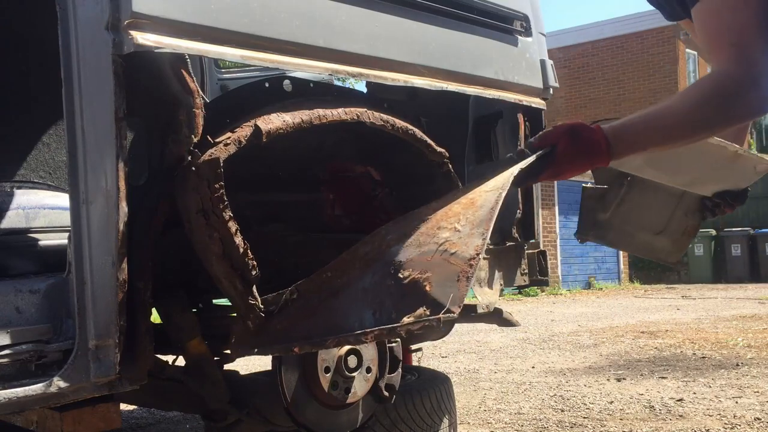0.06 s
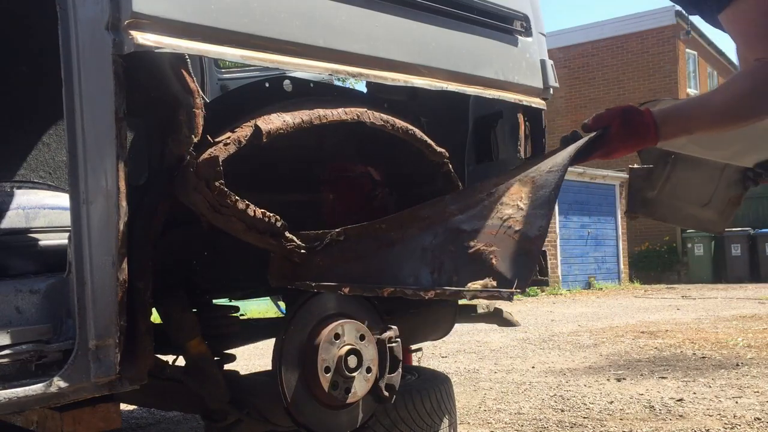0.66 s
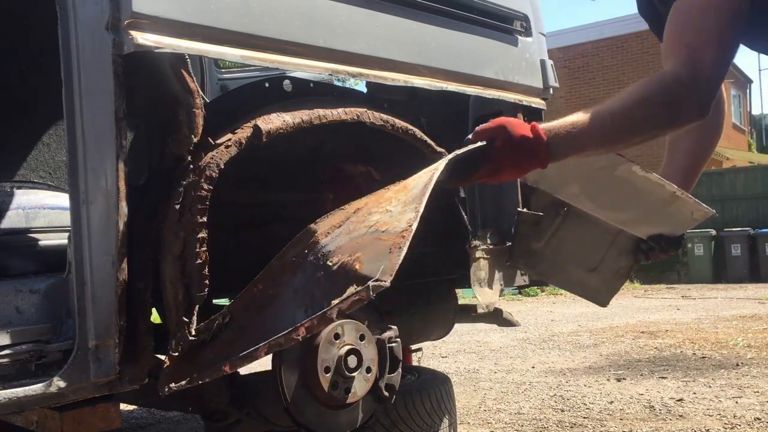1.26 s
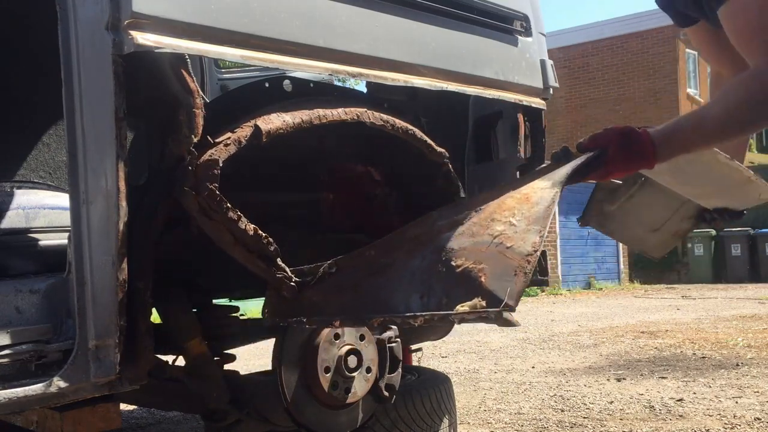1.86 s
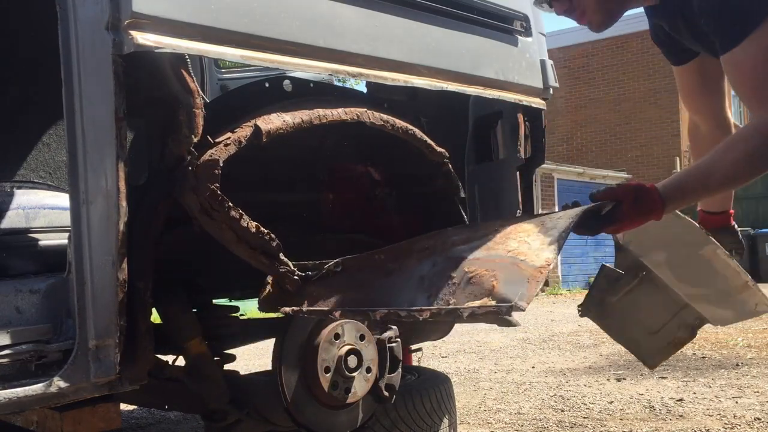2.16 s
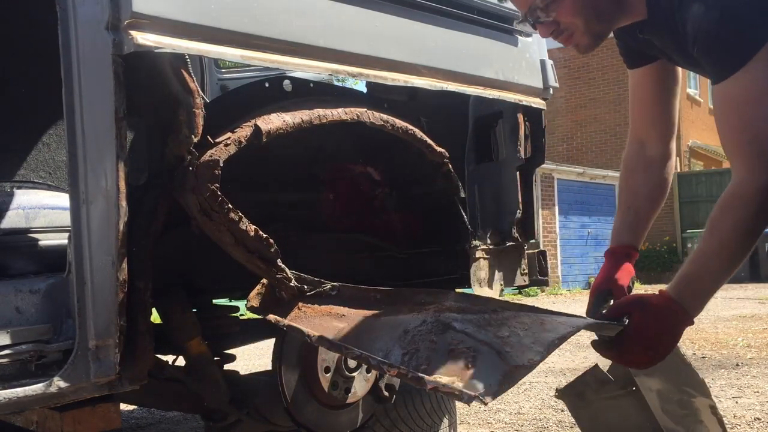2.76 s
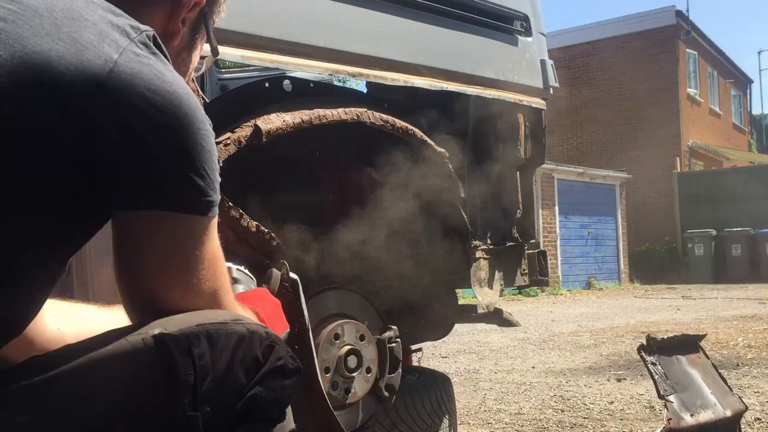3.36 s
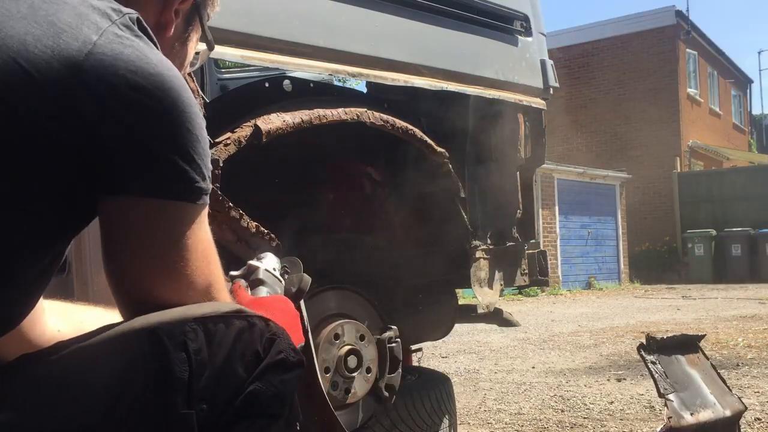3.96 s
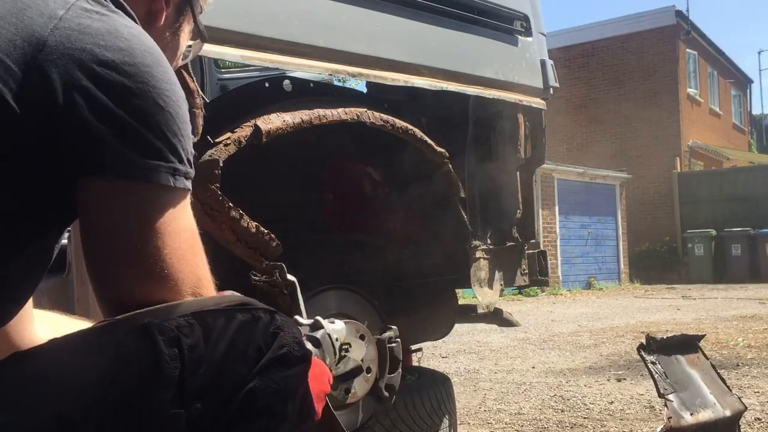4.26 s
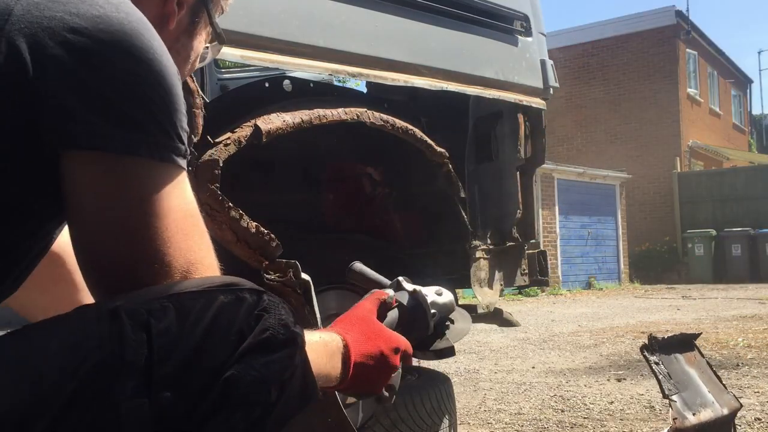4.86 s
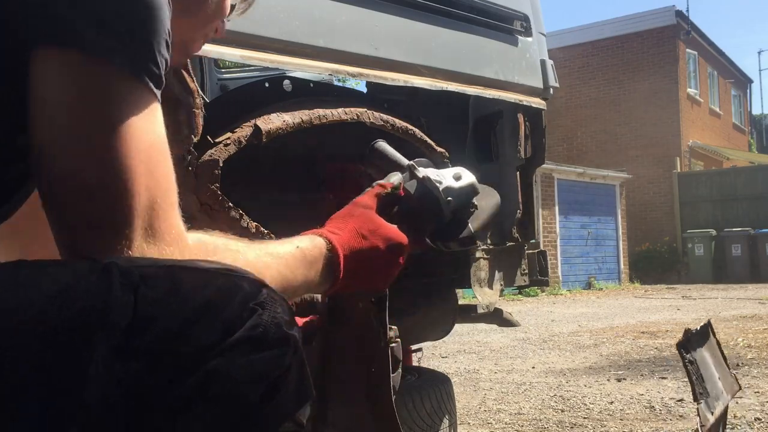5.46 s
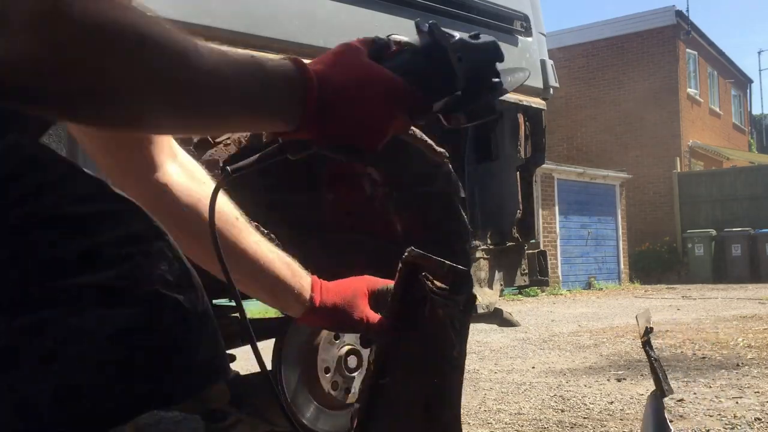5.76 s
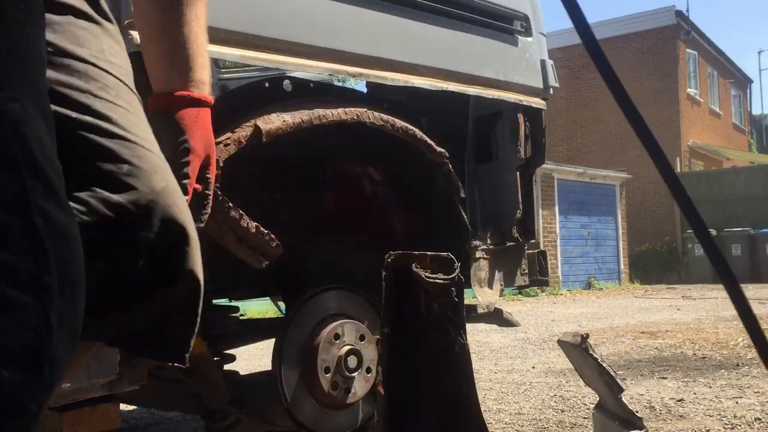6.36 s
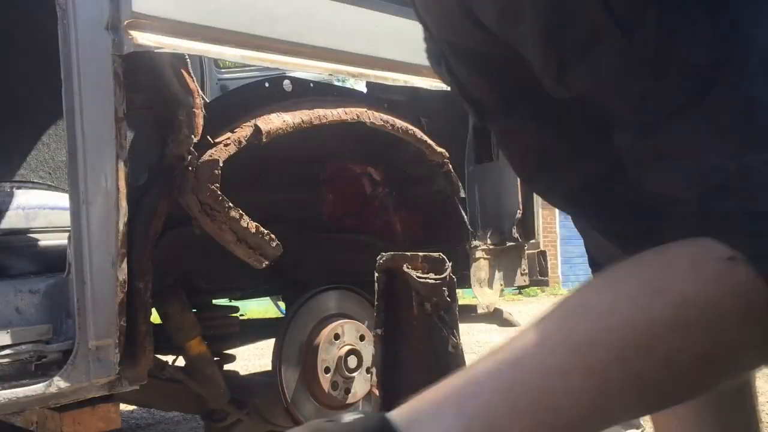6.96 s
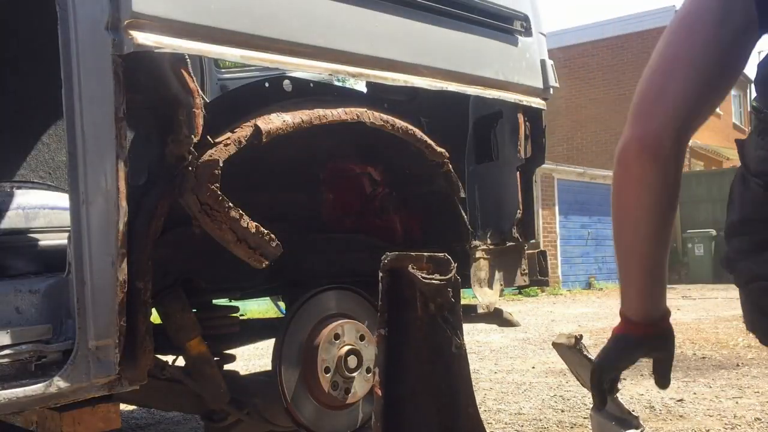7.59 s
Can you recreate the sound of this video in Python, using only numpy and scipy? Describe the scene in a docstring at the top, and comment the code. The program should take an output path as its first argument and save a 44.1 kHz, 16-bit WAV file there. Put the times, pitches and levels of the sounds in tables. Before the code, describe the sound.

Close up outdoors, a rusty steel panel is bent back and forth, crackling, creaking and snapping, with a few booming clangs as it buckles. Abruptly an angle grinder is cutting the metal, harsh and hissing, for under a second. Switched off, it coasts down with a falling whine and rattling gears. The loose panel gets knocked about, shoes scuff on gravel, and the grinder is set down with a clack.

```python
"""Rust crackles on a steel panel bent to and fro outdoors: seams snap, the sheet buckles and booms.
Abruptly an angle grinder is cutting it, grit tearing at the steel under a hiss of sparks.
Switched off, the grinder coasts down with a falling whine and the rattle of slack gears.
The freed panel is knocked about, shoes scuff the gravel and the grinder is put down."""
import sys
import numpy as np
from scipy import signal
from scipy.fft import rfft, irfft, next_fast_len
from scipy.io import wavfile
from scipy.ndimage import uniform_filter1d, map_coordinates

SR = 44100
rng = np.random.default_rng(int(sys.argv[2]) if len(sys.argv) > 2 else 0)


def unload_wav(signal):
    """Save mono or channel-first audio to the path in sys.argv[1] as 16-bit WAV at rate SR, clipped to [-1, 1]."""
    wavfile.write(
        sys.argv[1],
        SR,
        np.round(np.clip(np.atleast_2d(signal).T, -1, 1) * 32767).astype(np.int16),
    )


N = 336474
TIME = np.arange(N) / SR
CUT_START_S, CUT_END_S, SWITCH_OFF_S, PUT_DOWN_S = 3.264, 3.985, 4.08, 7.25
LOADED_SPEED, FREE_SPEED = 201, 228.8   # spindle turns per second, like every speed below


# Hits on the panel. Each row: start in seconds, boom, clang, crack and sizzle in dB, accent ring in Hz.
PANEL_HITS = [(0.58, -33.5, -26, -31.5, -34, 740), (1.119, -71, -55, -37.5, -28.5, 3500),
              (1.2509, -81, -48.5, -31.5, -32, 2900), (1.541, -88, -79, -43, -29.5, 1890),
              (1.821, -55.5, -50, -49, -63, 1710), (2.391, -58, -45, -43, -54, 1240),
              (2.507, -40.5, -29, -37.5, -40, 1070), (2.795, -35.5, -28, -45, -42.5, 1260),
              (2.899, -63, -37, -41.5, -54, 1530), (3.096, -41.5, -32.5, -40, -50, 572),
              (5.791, -53, -31, -24.5, -72, 2000), (6.005, -48, -35.5, -50, -39, 1440),
              (6.217, -29.5, -25.5, -58, -34, 753), (6.434, -68, -37.5, -45, -59, 960),
              (7.241, -50, -32.5, -25.5, -36, 3630)]
# Boom, clang, crack and sizzle. Each row: low and high edge in Hz, attack t60 in seconds,
# tail level in dB, tail t60 in seconds, grit in the tail in dB.
HIT_REGISTERS = [(75.5, 520, 0.2, 8, 0.37, -6.5), (504, 2200, 0.093, -18, 0.22, 0),
                 (1800, 4870, 0.032, -9.5, 0.14, -18), (4000, 9600, 0.0086, -20, 0.11, -13.5)]
# The sheet's resonances. Each row: pitch in Hz, width in Hz, lift in dB.
SHEET_MODES = [(138, 20, 2.5), (170.8, 5.8, 14), (236, 45, -5), (285.7, 4.9, 3.5), (316, 11, 4),
               (635, 58, 0.5), (775, 8.8, 0.5), (904, 27, -2.5), (1480, 8.5, 1)]

def panel_hits(ring_db=10, ring_q=22):
    """A hit is a sharp crack and a dense tail in the sheet; the low registers last longest."""
    out, age = np.zeros(N), TIME[:SR // 2]
    loose_edges = amp(1.3 * waver(200))
    for s, *levels_db, ring_hz in PANEL_HITS:
        start = int(s * SR)
        # the sheet is bent differently each time, so its upper modes move
        modes = [(hz, hz / 60, 0) for hz in np.geomspace(400, 5000, 14) * rng.uniform(.9, 1.1, 14)]
        modes.append((ring_hz, ring_hz / ring_q, ring_db / (1 + (ring_hz / 1700) ** 2)))   # rust damps highs
        for db, (low, high, attack_t60, tail_db, tail_t60, grit_db) in zip(levels_db, HIT_REGISTERS):
            grit = 1 + amp(grit_db) * rng.standard_normal(len(age))
            rattle = np.roll(loose_edges, -start)[:len(age)] * grit
            envelope = amp(-60 * age / attack_t60) + amp(tail_db - 60 * age / tail_t60) * rattle
            burst = bandpass(envelope * rng.choice([-1, 1], len(age)), low, high)
            ring = resonate(burst, SHEET_MODES + modes)
            attack_rms = np.std(ring[:int(0.0099 * SR)])
            out[start:start + len(age)] += amp(db) * ring[:N - start] / attack_rms
    return out


# Weight under two of the hits. Each row: start in seconds, level in dB.
SHEET_THUMPS = [(0.58, -40), (2.506, -35)]

def thumps(t60=0.68):
    """A deep thump heaves through the whole sheet."""
    s, db = np.transpose(SHEET_THUMPS)
    rumble = colour(noise(), [(40, -14), (78, 9.5), (105, 0), (200, 3.5), (290, -7)])
    return fade(clicks(s, amp(db)), t60) * rumble


# Bends and shakes. Each row: peak, rise and fall in seconds, rust level in dB, wobble level in dB.
SHEET_BENDS = [(0.01, 0.077, 0.085, -51.5, -49.5), (0.55, 0.1, 0.12, -42.5, -43.5),
               (0.91, 0.23, 0.11, -55, -55.5), (1.25, 0.66, 0.5, -65, -78), (1.57, 0.18, 0.37, -45, -65),
               (1.665, 0.063, 0.12, -60, -40), (2.63, 0.17, 0.16, -52.5, -49),
               (2.92, 0.36, 0.18, -53.5, -44), (3.15, 0.058, 0.12, -54.5, -44),
               (4.96, 0.29, 0.66, -71, -43.5), (5.87, 0.25, 0.32, -65, -33.5),
               (6.2, 0.99, 0.093, -56, -40.5), (6.54, 0.14, 0.096, -70.5, -41.5)]

def bending():
    """Strain sheds rust, slips the seam, creaks the fold and sets the sheet wobbling."""
    flaking, flexing = swells(SHEET_BENDS)
    return flaking * rust_crackle() + seam_slips() + flakes() + creaks() + flexing * wobble()


# Tone of crumbling rust. Each row: frequency in Hz, relative level in dB.
RUST_EQ = [(300, -35.5), (1250, -23), (1900, 5.5), (2500, -9), (3300, 0.5), (5500, -8), (16000, -14.5)]

def rust_crackle():
    """Rust breaks off in coarse, medium and fine grains."""
    crumbs = grains(per_s=200, spread_db=3.5, t60=.02) + amp(-11) * noise()
    for low, high in [(300, 2400), (2400, 5200), (5200, 16000)]:
        crumbs += bandpass(grains(per_s=180, spread_db=4.5, t60=0.028), low, high)
    return colour(crumbs, RUST_EQ)


# The rusty seam giving way. Each row: start in seconds, relative level in dB.
SEAM_SLIPS = [(0.182, -45), (0.456, -38), (0.473, -35.5), (0.501, -38.5), (0.531, -39), (0.557, -40),
              (0.792, -43), (0.909, -49), (1.394, -41.5), (1.47, -55), (1.516, -44), (1.596, -41),
              (1.62, -36.5), (1.719, -38.5), (2.587, -39), (2.602, -33), (2.767, -38), (3.203, -46.5)]

def seam_slips(t60=0.037, ring_db=8):
    """Each slip is a gritty tick with a pitch of its own, and stirs the hollow of the sheet."""
    out, age = np.zeros(N), TIME[:SR // 2]
    for s, db in SEAM_SLIPS:
        burst = rng.standard_normal(len(age)) * amp(-60 * age / t60)
        hz = rng.uniform(1400, 4000)
        tick = resonate(bandpass(burst, 1900, 8000, order=1), [(hz, hz / 6, ring_db)])
        hollow = resonate(burst, [(780, 130, -5)]) - burst
        start = int(s * SR)
        out[start:start + len(age)] += amp(db) * (tick + hollow)
    return out


# Single flakes. Each row: start in seconds, relative level in dB.
RUST_FLAKES = [(0.361, -40), (0.571, -29), (1.495, -43), (1.54, -25.5), (2.365, -39.5), (2.603, -50),
               (2.879, -41), (2.898, -29.5), (3.193, -45)]

def flakes():
    """A flake of rust cracks off with a thin, bright tick and a faint tail."""
    s, db = np.transpose(RUST_FLAKES)
    taps = clicks(s, amp(db))
    burst = (fade(taps, t60=0.012) + amp(-24) * fade(taps, t60=0.1)) * noise()
    return signal.sosfilt(signal.butter(2, 6500, "high", fs=SR, output="sos"), burst)


# Creaks in the fold. Each row: peak and half length in seconds, pitch in Hz, level in dB.
FOLD_CREAKS = [(0.808, 0.03, 2140, -45), (0.996, 1.03, 4200, -64.5), (1.648, 0.042, 780, -51),
               (2.129, 0.055, 1070, -49), (2.153, 0.033, 1880, -49), (1.822, 0.032, 1900, -45.5),
               (2.908, 0.057, 1940, -44.5)]

def creaks(slips_per_s=190, q=11):
    """Steel drags on steel: a fast, uneven run of slips rings one resonance and its overtone."""
    times = swings(slips_per_s, slip=0.83)
    drag = fade(clicks(times, rng.random(len(times))), t60=0.019) * noise()
    out = 0
    for s, half_s, hz, db in FOLD_CREAKS:
        ring = resonate(drag, [(hz, hz / q, 27), (1.5 * hz, hz / q, 2)]) - drag
        out += amp(db) * swell(s, half_s, half_s) * unit(ring)
    return out


# Tone of the flexing sheet. Each row: frequency in Hz, relative level in dB.
WOBBLE_EQ = [(70, -17.5), (160, -1.5), (300, -5), (450, -8), (780, -5.5), (1200, -7.5), (3000, -36)]

def wobble():
    """The flexing sheet drums, low and lumpy, in its own resonances."""
    return unit(resonate(colour(grains(per_s=140, spread_db=5.0, t60=0.17), WOBBLE_EQ), SHEET_MODES))


# The grinder comes out from behind the worker, swings past and is carried off.
# Each row: time in seconds, gain on its running noises in dB.
GRINDER_NEARNESS = [(3.26, -11), (3.95, -4), (4.25, 0), (5.0, 1.5), (5.45, 0), (5.77, 0.5), (6.55, -2),
                    (6.85, -9), (7.25, -7)]

def grinder(tight_speed=205, slack_span=70, feeble_speed=36.2, whine_speed=158, whine_span=70):
    """The cut plus fan, bearings and gears, whose levels follow the spindle speed until put down."""
    speed = spindle_speed()
    turns = np.cumsum(speed) / SR
    halvings = np.log2(FREE_SPEED / speed)
    slack = np.clip((tight_speed - speed) / slack_span, 0, .9)
    near_db, = curves(GRINDER_NEARNESS)
    feeble_db = 11 * np.maximum(np.log2(feeble_speed / speed), 0)   # extra loss near standstill
    fan_db = near_db - 26 - 9 * halvings
    bearing_db = near_db - 28.5 - 8 * halvings - 2 * feeble_db
    whine_db = near_db - 35.5 - 10 * ((speed - whine_speed) / whine_span) ** 2
    rattle, shaking = gear_rattle(speed, turns, near_db - 29.5 - feeble_db)
    # as the spindle slows, the play in the gears chops the running noise into bursts
    chop = np.sqrt(1 - slack + slack * np.abs(shaking))
    fan = np.sqrt(chop) * amp(fan_db) * fan_air()
    rush = chop * amp(bearing_db) * bearing_rush(turns)
    whine = chop * amp(whine_db) * gear_whine(turns, slack)
    hum = amp(fan_db - 25.5) * (1 - slack) * np.sin(4 * np.pi * turns + waver(50))
    roar = steel_echoes(fan + rush + cutting(turns))
    audible = (TIME > CUT_START_S) & (TIME < PUT_DOWN_S)
    return audible * (roar + whine + hum + rattle + chop * singing())


def spindle_speed(breakthrough_s=(3.55, 3.95), friction=42.28, drag_speed=147.58):
    """Up as the disc breaks through, then down under friction (turns per s per s) and fan drag."""
    driven = np.interp(TIME, breakthrough_s, [LOADED_SPEED, FREE_SPEED])
    off_s = np.maximum(TIME - SWITCH_OFF_S, 0)
    # drag equals friction at drag_speed
    coasting = drag_speed * np.tan(np.arctan(FREE_SPEED / drag_speed) - friction / drag_speed * off_s)
    return np.clip(coasting, 1, driven)


# Fader moves for the cut. Each row: time in seconds, relative grind and spark levels in dB.
CUT_LEVELS = [(3.28, -28, -42), (3.594, -30.5, -41), (3.696, -31.5, -56), (3.798, -29, -43),
              (3.898, -31, -56), (3.91, -32.5, -41), (4.048, -27, -50), (4.08, -22, -37)]
# Steel ringing at the slot. Each row: pitch in Hz, width in Hz, lift per pass in dB.
SLOT_MODES = [(1290, 90, 3.5), (1444, 60, 0), (2580, 180, -13.5), (4030, 80, -12)]
# Tones of the grind, sparks and ringing sheet. Each row: frequency in Hz, relative level in dB.
GRIND_EQ = [(1500, -4), (2200, -9), (2550, 5.5), (3150, 7.5), (4050, 7.5), (4700, 7), (4950, 4), (6200, -1),
            (8000, -9)]
SPARK_EQ = [(4500, -47), (6500, -1.5), (8300, 3), (10500, -4.5), (16000, -5)]
RING_EQ = [(90, 2.5), (160, -5), (400, -3.5), (700, 0), (1900, 1.5), (2600, -3)]

def cutting(turns, first_bite_s=0.17, lift_s=0.17):
    """Grit tears the steel, harder once a turn and whenever the disc bounces in the slot."""
    grind_db, spark_db = curves(CUT_LEVELS)
    # the sheet rings hardest as the disc first bites, then settles
    ring_db = -42 + 13 * np.exp(-((TIME - CUT_START_S) / first_bite_s) ** 2)
    bounce = np.sqrt(bursts(swings(80, slip=0.33), uneven_db=6.0, t60=0.047) + 0.53)
    bite = bounce * amp(0.53 * np.sin(2 * np.pi * turns))
    grind = colour(bite * grains(per_s=6400, spread_db=3.0, t60=0.0014), GRIND_EQ)
    for _ in range(2):
        grind = unit(resonate(grind, SLOT_MODES))
    sparks = colour(np.sqrt(bite) * grains(per_s=8900, spread_db=-6.0, t60=0.001), SPARK_EQ)
    ringing = unit(resonate(colour(np.sqrt(bite) * noise(), RING_EQ), SHEET_MODES))
    contact = np.clip(1 - (TIME - CUT_END_S) / lift_s, 0, 1)
    return contact * (amp(grind_db + 2.5) * grind + amp(spark_db + 11) * sparks + amp(ring_db) * ringing)


# The hardest knocks of the slack gears. Each entry: start in seconds.
GEAR_KNOCKS = [4.886, 4.96, 4.996, 5.017, 5.039, 5.057, 5.074, 5.099, 5.119, 5.351, 5.376, 5.441, 5.462,
               5.482, 5.505, 5.973, 5.994, 6.022, 6.053, 6.12, 6.146, 6.3, 6.361, 6.383, 6.435, 6.457,
               6.484, 6.513, 6.571, 7.105, 7.141]
# Tone of clashing teeth. Each row: frequency in Hz, relative level in dB.
GEAR_EQ = [(250, -21), (750, 1), (1200, -9), (2200, -2.5), (2700, 2), (4000, 4), (4900, 3), (7000, 1.5),
           (9000, 0), (10200, -8.5), (13300, -10.5), (16000, -10)]

def gear_rattle(speed, turns, rattle_db, clash_t60=0.054, knock_t60=0.029, swell_s=0.00055):
    """The slack gears swing and clash; returns the ringing housing and the relative shaking power."""
    hard = np.array(GEAR_KNOCKS)
    light = swings(np.minimum(31 + 0.38 * speed, 58), slip=.08)
    light = light[np.abs(light[:, None] - hard).min(axis=1) > .016]   # teeth fly free around a knock
    # these envelopes are powers, so decibels double and decay times halve
    strength = amp(2 * (rattle_db + rng.uniform(-1.5, 1.5, N)))
    bed = 0.11 * amp(2 * rattle_db)
    chatter = fade(clicks(light) * strength * amp(2 * 3.0), clash_t60 / 2) + bed
    knocks = fade(clicks(hard) * strength * amp(2 * 6.5), knock_t60 / 2)
    # a clash is a quick run of tooth contacts: it swells for a moment and pulses twice a turn
    pole = np.exp(-1 / (swell_s * SR))
    power = signal.lfilter([1 - pole], [1, -pole], chatter * amp(2 * np.sin(4 * np.pi * turns)) + knocks)
    clashes = np.sqrt(power) * noise()
    ringing = housing(colour(brighten(clashes, speed), GEAR_EQ))
    return np.std(clashes) * unit(ringing), power / uniform_filter1d(power, size=9000)


def brighten(x, speed, above_hz=5400, db_per_halving=3.5, neutral_speed=80):
    """The slower the gears turn, the more treble each clash has."""
    treble = signal.sosfiltfilt(signal.butter(2, above_hz, "high", fs=SR, output="sos"), x)
    halvings = np.clip(np.log2(neutral_speed / speed), -1, 1)
    return x + treble * (amp(db_per_halving * halvings) - 1)


# Resonances of the gear housing and guard. Each row: pitch in Hz, width in Hz, nominal lift in dB.
HOUSING_MODES = [(3680, 660, 1.5), (4110, 310, 5.5), (5370, 43, 14.5), (6830, 87, 7.5), (8350, 290, 9.5),
                 (9070, 78, 11.5), (11840, 160, 8), (14450, 260, 9)]

def housing(x, vary_db=4.5):
    """Every clash lands differently, so each resonance of the housing rings now more, now less."""
    for mode in HOUSING_MODES:
        drive = x * amp(vary_db * np.tanh(waver(35)))
        x = x + resonate(drive, [mode]) - drive
    return x


# Tone of the fan's draught. Each row: frequency in Hz, relative level in dB.
FAN_EQ = [(150, -20.5), (470, -14), (700, 3.5), (1100, -4.5), (1400, 1.5), (2700, 3.5), (4500, 3.5),
          (4950, -6.5), (5800, 3.5), (7500, -6), (16000, -15.5)]

def fan_air(guard_hz=4140):
    """The draught keeps its colour at any speed, ringing the guard and, faintly, the housing."""
    modes = [(hz, width, db - 19) for hz, width, db in HOUSING_MODES] + [(guard_hz, 56, 0.94)]
    return unit(resonate(colour(noise(), FAN_EQ), modes))


# Tone of the bearings. Each row: multiple of the spindle speed, relative level in dB.
BEARING_ORDERS = [(2, -5.5), (6, -33), (13, 3.5), (20, -16), (23.5, 7), (29, 3), (43, 4.5), (48, 11.5),
                  (57, 2.5), (85, -14), (90, -23)]
# How well the guard radiates them. Each row: frequency in Hz, relative level in dB.
GUARD_EQ = [(400, -2.5), (900, -9), (1600, -0.5), (2400, 0), (3000, 5.5), (3750, 6), (4150, 6), (4550, 8),
            (4950, -9.5), (9000, -31)]

def bearing_rush(turns, steps_per_turn=360):
    """Roughness rolls by with the spindle, so the rush falls in pitch as it slows."""
    roughness = rng.standard_normal(int(turns[-1] * steps_per_turn) + 2)
    race = colour(roughness, BEARING_ORDERS, steps_per_turn)
    return colour(map_coordinates(race, [turns * steps_per_turn], order=3), GUARD_EQ)


# Gear and motor tones. Each row: multiple of the spindle speed, relative level in dB.
WHINE_ORDERS = [(22.55, -3), (37, 1), (74, -20)]

def gear_whine(turns, slack):
    """Tones locked to the spindle, roughened as slack teeth mesh unevenly."""
    jitter = 0.26 * waver(55) + 0.46 * slack ** 2 * waver(300)
    return sum(amp(db + 3.5 * waver(70)) * np.sin(2 * np.pi * multiple * turns + jitter)
               for multiple, db in WHINE_ORDERS)


# Disc and guard sing out. Each row: peak and half length in seconds, pitch and width in Hz, level in dB.
SINGING_SWELLS = [(3.366, 0.09, 4020, 262, -26), (3.607, 0.026, 2540, 251, -30.5),
                  (4.58, 0.17, 4147, 130, -32), (5.39, 0.037, 5370, 160, -31.5)]

def singing():
    """A rubbed resonance swells and dies away."""
    out = 0
    for s, half_s, hz, width, db in SINGING_SWELLS:
        envelope = np.exp(-np.minimum(((TIME - s) / half_s) ** 2, 60) / 2)
        out += amp(db) * envelope * unit(bandpass(noise(), hz - width / 2, hz + width / 2))
    return out


def steel_echoes(x, echo_db=-14, sway_s=0.00006, count=6):
    """Close steel walls add short, hollow echoes that shift as the grinder moves."""
    lags_s = rng.uniform(.002, .011, count)
    echoes = sum(np.interp(TIME - lag - sway_s * waver(3), TIME, x, left=0) for lag in lags_s)
    return (x + amp(echo_db) * echoes) / np.sqrt(1 + count * amp(2 * echo_db))


# Shoes on gravel. Each row: peak, rise and fall in seconds, crunch, thud and hiss levels in dB.
SHOE_SCUFFS = [(6.79, 0.16, 0.096, -33.5, -45, -48), (6.96, 0.33, 0.39, -42, -52.5, -80),
               (7.32, 0.014, 0.043, -42.5, -47, -40), (7.37, 0.14, 0.17, -42.5, -46.5, -47),
               (7.46, 0.076, 0.19, -40, -62, -50), (7.61, 0.071, 0.079, -47, -55, -52)]
# Tone of the stones. Each row: frequency in Hz, relative level in dB.
GRAVEL_EQ = [(120, -28), (600, -1.5), (1500, -4.5), (3000, -6.5), (7000, -13), (16000, -36)]

def footsteps():
    """Small stones grind and sand hisses under the soles, over the dull thud of the heel."""
    crunch, thud, hiss = swells(SHOE_SCUFFS)
    stones = colour(grains(per_s=1100, spread_db=-14.5, t60=0.045), GRAVEL_EQ)
    sand = colour(grains(per_s=2900, spread_db=4, t60=0.0043), [(5000, 1), (16000, -9)])
    heel = colour(noise(), [(90, -0.5), (160, 0.5), (350, -6.0), (800, -12)])
    return crunch * stones + hiss * sand + thud * heel


# Tone of the outdoor bed. Each row: frequency in Hz, relative level in dB.
AIR_EQ = [(36, 6), (80, 10), (180, -5), (420, -21.5), (4000, -31), (16000, -45.5)]

def outdoor_air():
    """A faint, steady, low rush of open air."""
    return amp(-61.5) * colour(noise(), AIR_EQ)


def amp(db):
    """Decibels to gain."""
    return 10 ** (np.asarray(db) / 20)


def unit(x):
    """Scale to rms 1."""
    return x / np.sqrt(np.mean(x ** 2) + 1e-20)


def noise():
    """White noise."""
    return rng.standard_normal(N)


def waver(rate):
    """Random drift with a spread of about 1 and rate new values a second."""
    return np.interp(TIME * rate, np.arange(4096), rng.standard_normal(4096))


def curves(rows):
    """Each level column of a table, joined by straight lines in time."""
    s, *columns = np.transpose(rows)
    return [np.interp(TIME, s, c) for c in columns]


def swell(s, rise_s, fall_s, shape=0.91):
    """Pointed gain curve that peaks at s and is a tenth of that rise_s earlier and fall_s later."""
    coarse = TIME[::64]
    away = np.maximum((s - coarse) / rise_s, (coarse - s) / fall_s)
    return np.interp(TIME, coarse, 10 ** -np.minimum(np.abs(away) ** shape, 10))


def swells(rows):
    """One gain curve for each level column of a table of swelling events."""
    return np.sqrt(sum(np.outer(amp(db), swell(s, rise, fall)) ** 2 for s, rise, fall, *db in rows))


def bandpass(x, low_hz, high_hz, order=2):
    """Keep one band of x."""
    return signal.sosfilt(signal.butter(order, [low_hz, high_hz], "band", fs=SR, output="sos"), x)


def colour(x, spectrum, per_unit=SR):
    """EQ x, rolling off past the curve's ends (per_unit samples to a second, or to a turn); rms 1."""
    f, db = np.transpose(spectrum)
    size = next_fast_len(len(x) + 2048)
    log_f = np.log(np.maximum(np.arange(size // 2 + 1) * per_unit / size, 1e-3))
    beyond = np.abs(log_f - np.clip(log_f, np.log(f[0]), np.log(f[-1])))
    gain = amp(np.interp(log_f, np.log(f), db) - 40 * beyond)
    return unit(irfft(rfft(x, size) * gain, size)[:len(x)])


def resonate(x, modes):
    """Pass x through a body: each resonance lifts its own narrow band."""
    for hz, width, db in modes:
        r = np.exp(-np.pi * width / SR)
        ring = signal.lfilter([1, 0, -1], [1, -2 * r * np.cos(2 * np.pi * hz / SR), r * r], x + 1e-18)
        x = x + amp(db) * (1 - r * r) / 2 * ring
    return x


def clicks(seconds, heights=None):
    """Single-sample taps at the given times, of height 1 by default."""
    return np.bincount(np.clip(np.round(seconds * SR).astype(int), 0, N - 1), heights, N)


def fade(taps, t60):
    """Each tap starts an exponential decay, 60 dB down after t60 seconds."""
    return signal.lfilter([1], [1, -amp(-60 / (t60 * SR))], taps + 1e-18)


def grains(per_s, spread_db, t60):
    """Tiny fractures as random bursts: a few stand out, or drop back if spread_db is negative."""
    sizes = amp(spread_db * np.minimum(rng.exponential(1, N), 3.5))
    return unit(noise() * np.sqrt(fade((rng.random(N) < per_s / SR) * sizes ** 2, t60 / 2)))


def swings(rate, slip):
    """Times of a loose part that strikes about rate times a second, never evenly."""
    phase = np.maximum.accumulate(np.cumsum(rate * np.ones(N)) / SR + slip * waver(50))
    return np.flatnonzero(np.diff(np.floor(phase)) > 0) / SR


def bursts(seconds, uneven_db, t60):
    """Power of a run of unequal bursts; about 1 on average."""
    heights = amp(2 * rng.uniform(-uneven_db, uneven_db, len(seconds)))
    power = fade(clicks(seconds, heights), t60 / 2)
    return power / (uniform_filter1d(power, size=9000) + 1e-3)


def scene():
    """Panel, grinder and shoes, close and centred, over faint outdoor air."""
    mono = panel_hits() + thumps() + bending() + grinder() + footsteps() + outdoor_air()
    return np.array([mono, mono])


def record(dry):
    """A steep low-pass trims the very top."""
    return signal.sosfilt(signal.ellip(12, .1, 80, 15900, fs=SR, output="sos"), dry)


dry = scene()
out = record(dry)
unload_wav(out)
```